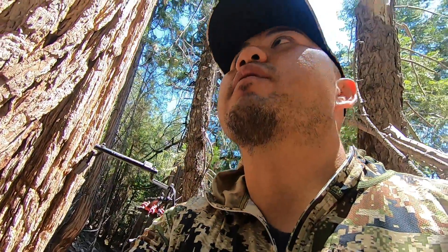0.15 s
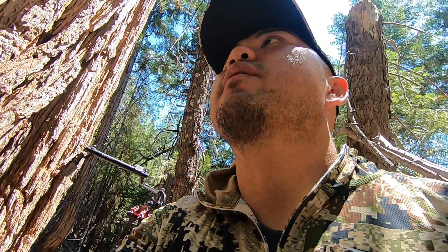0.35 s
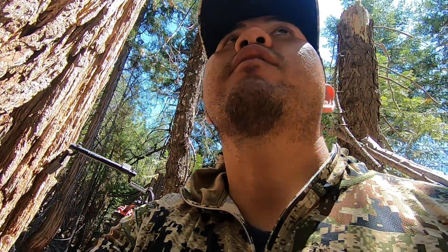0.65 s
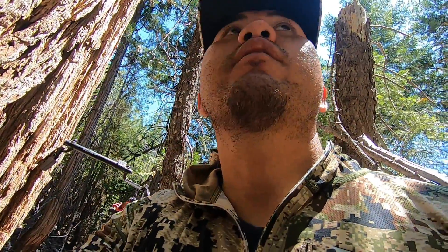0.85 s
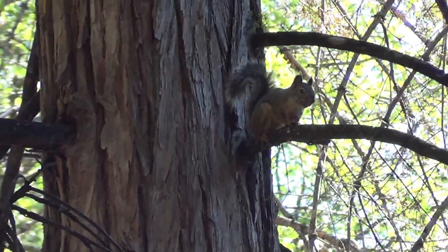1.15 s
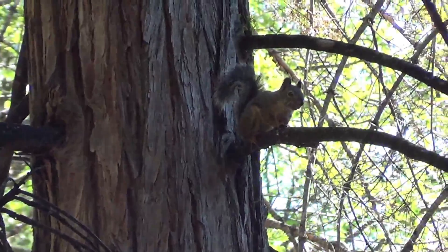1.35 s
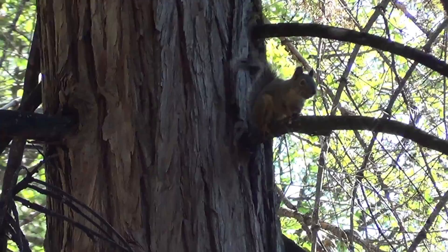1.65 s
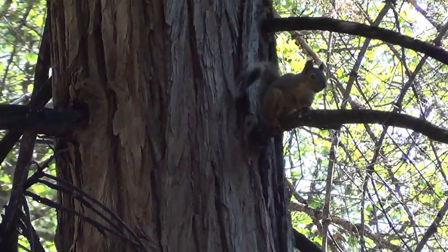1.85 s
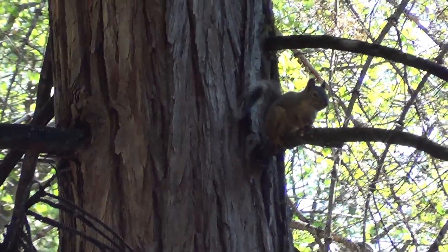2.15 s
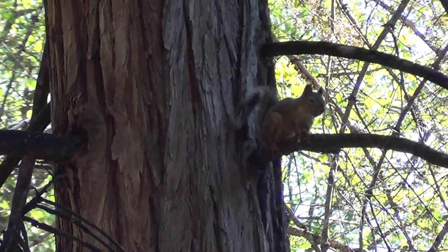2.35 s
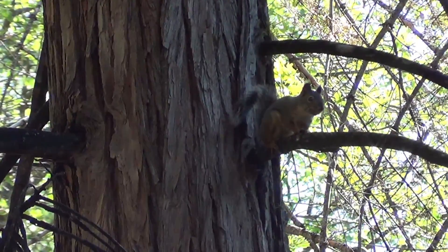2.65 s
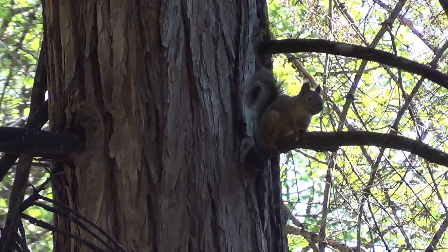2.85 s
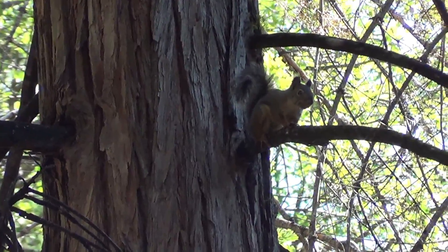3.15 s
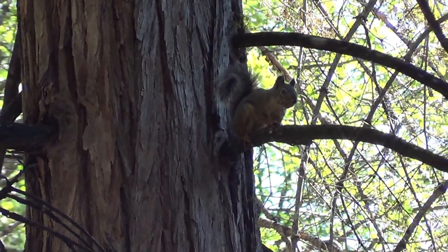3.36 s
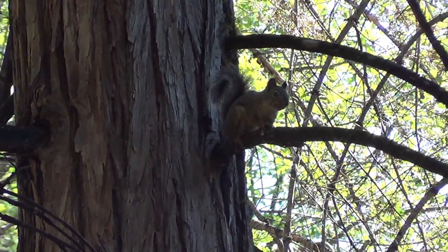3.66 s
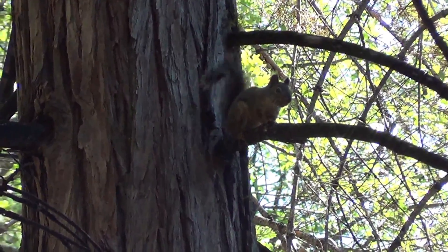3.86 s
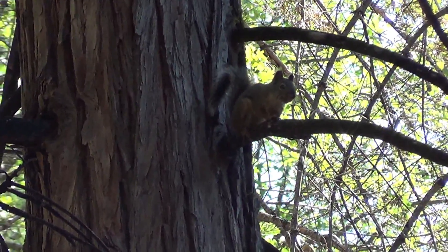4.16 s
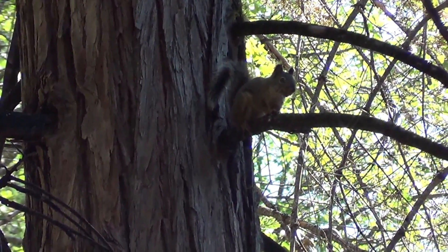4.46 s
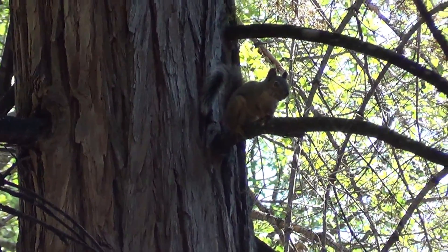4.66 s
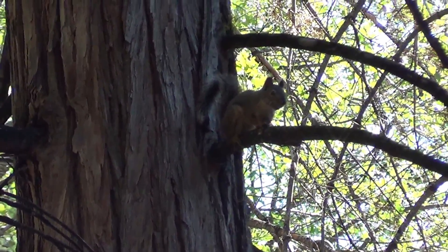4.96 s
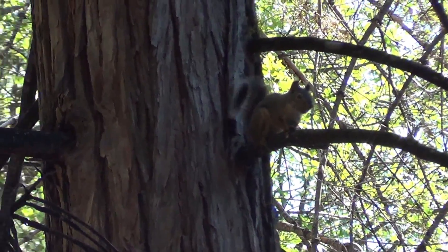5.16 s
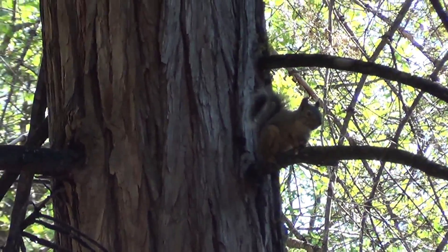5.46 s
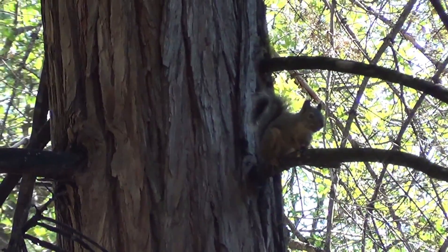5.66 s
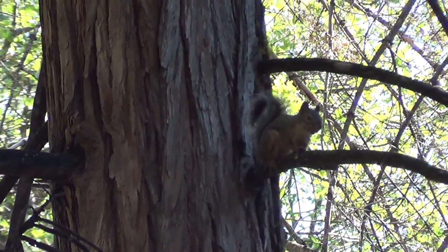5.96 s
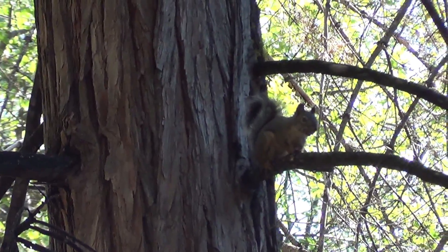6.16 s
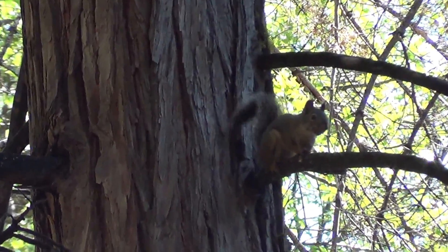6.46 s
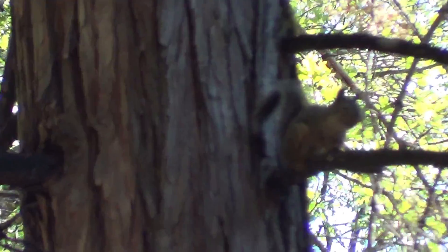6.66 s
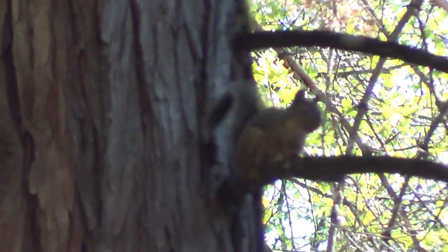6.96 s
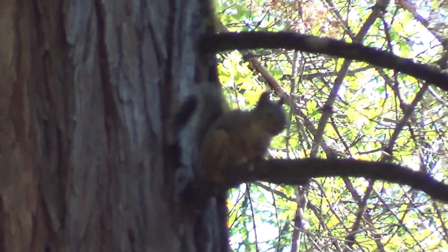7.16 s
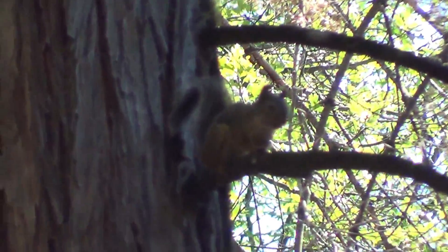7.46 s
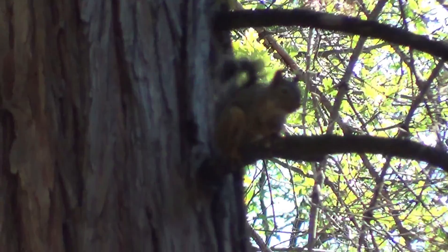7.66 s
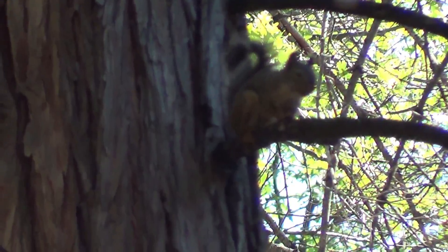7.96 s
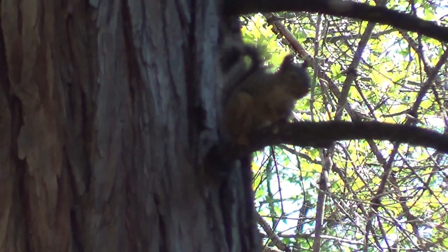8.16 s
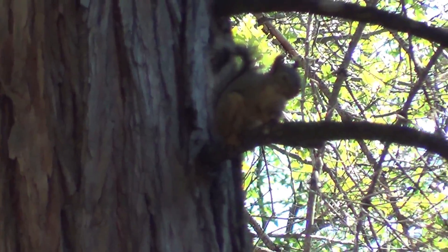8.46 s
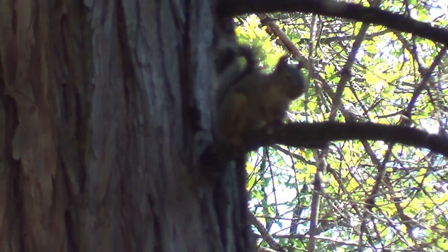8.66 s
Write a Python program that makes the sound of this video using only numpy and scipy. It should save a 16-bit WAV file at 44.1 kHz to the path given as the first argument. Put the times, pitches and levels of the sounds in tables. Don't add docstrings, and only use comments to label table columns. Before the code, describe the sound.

For the first second a hand and sleeve rub loudly over a small recorder, hissing, creaking and thudding, with sharp button snaps. It cuts abruptly to a much quieter forest: soft air hiss, faint motor whirr and a thin high whine. A squirrel scolds six times, about every 1.2 seconds, each a short rising chirp sinking into a faint sigh, with woodland echo. Small casing ticks, finger rustles and rare tiny bird chips fall between.

```python
import sys
import numpy as np
from scipy import signal
from scipy.fft import rfft, irfft
from scipy.io import wavfile

SR = 44100
rng = np.random.default_rng(int(sys.argv[2]) if len(sys.argv) > 2 else 0)


def to_linear_factor(level_db):
    exponent = np.asarray(level_db, float) / 20
    return 10 ** exponent


def wrap_up_sound(samples):
    columns = np.atleast_2d(samples).T
    tamed = np.clip(columns, -1, 1)
    steps = np.round(tamed * 32767).astype(np.int16)
    wavfile.write(sys.argv[1], SR, steps)


N = 388521

# t/s, sliding speed/dB, grip/dB
HAND = [(0, -35, -41.5), (.06, -38, -49.5), (0.122, -31, -53), (0.207, -24.5, -49.5), (.2145, -24.5, -48),
        (0.219, -31, -35), (0.232, -73, -50), (.26, -63.5, -55), (0.308, -50.5, -58.5), (.4, -36.5, -44),
        (0.443, -27.5, -39.5), (.472, -46, -39), (.53, -48, -37.5), (.66, -44, -34), (0.707, -48.5, -35),
        (0.712, -27.5, -27.5), (.766, -42.5, -30), (.772, -60, -40), (.782, -64, -44), (.83, -52, -37),
        (1.009, -46, -25), (1.02, -29.5, -19), (1.029, -17.5, -22), (1.034, -32, -20), (1.046, -60, -46)]
# level at mean speed and grip/dB, share of speed, share of grip
THUD_LAW = (-46.5, .01, 0.98)
SHELL_LAW = (-33, 0.87, -0.21)
RASP_LAW = (-36, 1, 0.015)
HISS_LAW = (-37.5, 1.27, -0.35)
# f/Hz, level/dB
RUB_COLOUR = [(27, -23), (60, -18), (102, -25.5), (190, -15), (290, -27.5), (494, -29.5), (941, -8),
              (1110, 6.5), (1450, 0), (2050, -0.5), (2450, -9), (3260, -6.5), (4890, -12.5), (6660, -14),
              (7800, -14), (9500, -15), (10600, -28.5), (14800, -38), (15400, -70)]
# f/Hz, side over mid/dB
RUB_SIDE = [(60, 4), (110, -5), (200, -5), (380, -4), (700, 10), (1290, 8.5), (2380, -1.5), (4400, -2.5),
            (8120, 2.5), (15000, -5.5)]
# f/Hz, share of side lagging mid, share of side in step with mid
RUB_TIE = [(300, .2, 0), (1200, 0.99, 0.0048), (1994, 0.79, 0.), (3470, 0.017, 0.0054), (5970, 0.13, 0),
           (7900, 0.35, 0.64), (11900, .1, 0.16)]
# t/s, length/s, level/dB, centre f/Hz, left over right/dB
DRAGS = [(0, .11, -40.5, 6900, 6), (0, 0.062, -39, 1160, 0), (.115, .055, -23.5, 1990, 1),
         (.17, .047, -24, 7800, 12), (.175, .04, -26, 2930, 2), (.15, .065, -34, 9200, 5),
         (.375, 0.1, -27.5, 1280, -1.5), (.41, 0.054, -41, 2040, -14), (.995, .035, -56, 11000, 2),
         (1.022, 0.015, -25.5, 1580, 1), (.81, 0.17, -56, 5000, -3), (.53, .12, -44, 1930, -4),
         (.625, .06, -43.5, 6900, 1), (.63, .05, -47, 3750, 0), (0.65, 0.046, -45, 7500, 4),
         (.1, 0.055, -32.5, 3250, 0), (.9, 0.14, -42, 2900, -4)]
# t/s, rasp/dB, thud/dB, sideways ring/dB
SLIPS = [(.218, -19.5, -21, -10), (0.364, -20.5, -24, -30), (.432, -27, -55, -7), (0.4784, -12, -22.5, 4),
         (.496, -23, -23.5, -19), (.517, -32, -22.5, -6), (0.5478, -23, -24, -20), (.566, -42, -42, -6),
         (0.5831, -19, -32, -5), (.596, -37, -27, -23), (0.617, -20, -29, -10), (.635, -22, -28, -5),
         (0.6513, -21.5, -34, -18), (0.6775, -16.5, -36, -7), (0.7105, -17, -27, -14.5),
         (.7645, -17, -44, -26), (0.7887, -28, -39, -23), (.819, -16, -22.5, -30),
         (0.8392, -20.5, -32, -27), (.858, -26, -22, -34), (.878, -19, -18, -27),
         (0.8928, -18.5, -16.5, -34), (0.9083, -26.5, -16, -25), (0.9329, -17.5, -15.5, -27),
         (0.9561, -16, -30, -23), (0.9742, -16.5, -28, -23.5), (0.9866, -17.5, -15, -39),
         (1.0005, -20, -34, -30), (1.012, -32, -17, -30), (1.0195, -10, -23, -28), (1.005, -19, -25, -26),
         (1.0275, -15.5, -10.5, -30)]
# f/Hz, t60/s
THUD = (174, 0.023)
# f/Hz, t60/s
SHELL = (1225, 0.0098)
# f/Hz, level/dB, t60/s
RASP = [(850, -3, 0.0031), (1620, -3, 0.004), (2636, -2, 0.0046), (3200, -12.5, 0.0047),
        (4620, -6.5, 0.0026), (6740, -31, 0.0048)]
# t/s, peak level/dB
SNAPS = [
    (0.2185, 3),
    (0.365, -22),
    (0.8306, -44),
    (1.0313, -7.5),
    (1.038, -38),
    (1.0451, -42),
    (1.072, -49),
]
# f/Hz, level/dB
HUSH = [(15, -43), (25, -6), (118, 0.5), (450, -1), (488, -3), (1810, -9), (2430, -13), (2850, -15.5),
        (3440, -20), (3830, -11.5), (4500, -15.5), (5280, -12), (15000, -18)]
# f/Hz, side over mid/dB
HUSH_SIDE = [(60, -13), (110, -11.5), (200, -3.5), (380, -0.5), (700, 4), (1290, 3), (2380, 3.5),
             (4400, 2.5), (8120, -6), (15000, -12.5)]
# f/Hz, width/Hz, level/dB
WHIR = [(2510, 240, -70), (3406, 145, -65.5), (3551, 87, -63.5), (4436, 140, -65.5), (4880, 70, -71.5),
        (5720, 210, -73.5)]
# f/Hz, level/dB
WHINE = [(11832, -80), (15734.3, -70),
         (15747.6, -75)] + [(15734.3 - 59.94 * k, -88 - k) for k in range(1, 8)]
# t/s, length/s, level/dB, centre f/Hz, width/octaves
RUSTLES = [(1.125, 0.64, -66, 113.3, 0.13), (2.216, 0.12, -55, 2170, 2.6), (2.483, 0.14, -56, 527, 0.85),
           (3.114, 0.079, -57, 5700, 1.6), (3.119, 0.085, -57.5, 830, 0.8), (4.84, .1, -67, 8400, .6),
           (5.402, 0.28, -67, 1070, 0.7), (5.681, 0.1, -60, 1050, .5), (5.8, .25, -63.5, 200, 1.5),
           (6.15, 0.92, -58.5, 3800, 1.5), (6.28, 0.49, -63, 1120, 0.46), (6.381, .04, -59, 3700, .2),
           (6.638, 0.05, -55, 1150, 0.8), (6.704, 0.064, -55.5, 1220, 0.47),
           (6.787, 0.039, -58, 1180, 0.57), (6.788, 0.029, -52, 3200, 0.64),
           (6.582, 0.043, -54.5, 3100, 0.72), (6.573, 0.29, -58, 561, 0.22), (6.644, 0.13, -57, 3120, 0.91),
           (8.601, 0.4, -53.5, 3450, 1.8), (8.61, 0.22, -56, 4730, 0.16), (4.548, 0.12, -63, 1250, 0.42),
           (7.34, .1, -63, 7000, .35), (5.7, 0.086, -63.5, 7500, 0.61)]
# t/s, peak level/dB, snap f/Hz, hollow part/dB, sharp part/dB (both relative)
TICKS = [(1.262, -40, 2520, -16, 2), (2.006, -36.5, 2200, -13.5, 3.5), (2.258, -41, 2260, -14, -1),
         (2.4705, -22, 930, -5.5, -33), (3.116, -35, 1280, -11, -18), (3.376, -40, 1240, -15, -20),
         (3.429, -30, 1860, -46, -29), (4.21, -45, 1150, -19, 9), (4.461, -41.5, 1200, -16, 3),
         (5.178, -34, 1260, -19, -14), (5.811, -34, 1010, -10, -19), (5.973, -34, 950, -11, -21),
         (2.4702, -21.5, 2130, -47, -18), (6.659, -40.5, 1160, -6.5, -13), (6.705, -42, 1280, -25, -9),
         (6.889, -41, 910, -14, -12), (6.961, -41, 2520, -7.5, 3.5), (7.161, -34, 1150, -14, 2),
         (8.026, -41.5, 1150, -19, -10), (2.458, -37, 2310, -20, -23), (3.928, -31.5, 1300, -15.5, -30),
         (5.228, -35, 980, -5, -25), (5.827, -43, 1011, -26, -20), (7.704, -42, 1150, -12, -30),
         (7.7, -45, 1700, -30, -30), (7.711, -46, 800, -20, -30), (6.735, -46, 1250, -10, -20),
         (6.8, -47, 3000, -12, -10), (2.004, -43, 1150, -30, -30), (3.116, -38.5, 2200, -40, -30),
         (3.375, -38.5, 2050, -40, -30), (5.1776, -33.5, 2150, -38, -14), (5.2267, -38, 2250, -40, -30),
         (5.809, -38.5, 3150, -40, -30), (5.9722, -38, 2630, -40, -30), (7.1605, -33, 2220, -40, -30),
         (2.878, -47, 690, -4.5, -20), (6.705, -46, 2270, -40, -30), (6.956, -42.5, 480, -7, -30),
         (2.476, -34, 1260, -40, -30), (3.309, -52, 1475, -30, -20), (4.4605, -36.5, 2900, -40, -16),
         (7.161, -38, 5830, -40, -10)]
# pitch ratio, share, t60/s
SNAP_PARTIALS = [(1, 0.77, 0.013), (1.12, 0.38, 0.011), (1.75, 0.1, 0.0053), (2.5, 0.11, 0.013)]
# f/Hz, level/dB, t60/s
CASING = [(369, -0.5, 0.11), (460, -13, 0.13), (513, -1, 0.04), (586, -7.5, 0.13), (521.5, -10, 0.21),
          (910, 0, 0.068), (1150, -9, 0.061), (1280, -21, 0.14), (763, -14.5, 0.089)]
# t/s, length of the cry/s, top f/Hz, level/dB, stretch of the sigh
CHIRPS = [
    (1.544, .042, 2077, -1, 1.08),
    (2.744, 0.041, 2075, 0, 1.04),
    (3.902, 0.042, 2104, 0.7, 1.08),
    (5.238, 0.041, 2086, 1, 0.82),
    (6.44, .042, 2053, 1, 0.84),
    (7.646, 0.044, 2075, -0.5, 0.93),
]
# share of its length, f/Hz, fundamental level/dB, overtones/dB (relative)
CRY = [
    (0, 1843, -52.5, 4),
    (.2, 1881, -39.5, -0.5),
    (.33, 1951, -39.5, 6.5),
    (.58, 1962, -39.5, 4),
    (.8, 2032, -40, 1.5),
]
# t after the cry/s, drop in f/Hz, fundamental level/dB, overtones/dB (relative)
SIGH = [
    (.012, 106, -45, -11),
    (0.029, 257, -59, -21),
    (.06, 359.6, -62, -26),
    (.11, 505, -60, -32),
    (.15, 626, -61.5, -44),
    (.2, 680, -74, -40),
]
# multiple of the pitch, level/dB
OVERTONES = [(1, -0.5), (2, -9.5), (3, -6), (4, -12), (5, -3.5), (6, -19.5), (7, -28)]
# f/Hz, width/Hz, lift/dB
MOUTH = [(4133, 103, 10), (5810, 190, 5)]
# t/s, length/s, start f/Hz, end f/Hz, level/dB
BIRDS = [
    (2.295, 0.0107, 6140, 7050, -37.5),
    (2.305, .012, 7400, 9000, -41.5),
    (2.313, 0.0102, 9040, 6840, -46.5),
    (7.36, 0.03, 6600, 7000, -62),
    (7.385, .03, 7600, 8600, -63),
    (6.712, 0.091, 9360, 8250, -64),
    (8.583, 0.016, 5890, 7350, -35),
    (8.579, .0081, 4810, 6210, -52.5),
    (8.599, 0.011, 6200, 7110, -44),
    (8.6, 0.0081, 8010, 8400, -44),
]

MEAN_SPEED_DB, MEAN_GRIP_DB = -35, -45
CUFF_S, CUFF_HALF_WIDTH_S, CUFF_LIFT_DB = 0.418, 0.034, 5.9
HISS_DIP_FROM_S, HISS_DIP_TO_S, HISS_DIP_DB = .775, 1.02, 15
GRIND_FROM_S, GRIND_TO_S, GRIND_LIFT_DB = .8, 1.02, 3.5
DRAG_OCTAVES, DRAG_LUMP_DB = 0.27, 2.5
CHATTER_FROM_S, CHATTER_TO_S, CHATTER_COUNT = .485, 1.02, 40
CHATTER_DB, CHATTER_SPREAD_DB = -30, 17
HAND_HISS_DB = -65
GAP_DB, GAP_FROM_HZ, GAP_BAND_HZ = -81.5, 8000, 500
CUT_S, FADE_S = 1.046, .03
HUSH_DB = -56
GRAIN_DB = 4
FOREST_T60_S, FOREST_DB = 0.41, -9.5
TOP_DB, TOP_BRIGHT_DB = -42, -3.5
TRUNK_ECHO_S, TRUNK_ECHO_DB = .066, -19


def rms_one(x):
    return x / np.sqrt(np.mean(x ** 2) + 1e-20)


def at_hz(points, hz, column=1):
    points = np.array(points)
    return np.interp(np.log(hz + 1), np.log(points[:, 0]), points[:, column])


def drift(rate_hz, size):
    knot_rate = 400
    knots = rng.standard_normal(int(size / SR * knot_rate) + 40)
    r = np.exp(-2 * np.pi * rate_hz / knot_rate)
    slow = rms_one(signal.lfilter([1], [1, -2 * r, r * r], knots)[30:])
    return np.interp(np.arange(size) / SR * knot_rate, np.arange(len(slow)), slow)


def ring(x, hz, t60):
    r = to_linear_factor(-60 / (max(t60, .002) * SR))
    w = 2 * np.pi * hz / SR
    return signal.lfilter([0, np.sin(w)], [1, -2 * r * np.cos(w), r * r], x + 1e-18)


def above(x, cut_hz):
    return signal.sosfilt(signal.butter(2, cut_hz, "high", fs=SR, output="sos"), x)


def between(x, low_hz, high_hz, order=2):
    return signal.sosfilt(signal.butter(order, [low_hz, high_hz], "band", fs=SR, output="sos"), x)


def ports(mid, side):
    return np.array([mid + side, mid - side])


def blows(times, gains, size, spread_s):
    span = 400
    out = np.zeros(size + span)
    fall = np.exp(-np.arange(span) / (spread_s * SR))
    firm = 2.6 * (np.arange(span) == 0)
    for s, gain, grit in zip(times, gains, rng.standard_normal((len(times), span))):
        contact = grit * fall + firm
        out[round(s * SR):][:span] += gain * contact / np.linalg.norm(contact)
    return out[:size]


def rub_levels(s, speed_db, grip_db):
    thud, shell, rasp, hiss = [
        db + by_speed * (speed_db - MEAN_SPEED_DB) + by_grip * (grip_db - MEAN_GRIP_DB)
        for db, by_speed, by_grip in (THUD_LAW, SHELL_LAW, RASP_LAW, HISS_LAW)]
    shell = shell + CUFF_LIFT_DB * np.exp(-((s - CUFF_S) / CUFF_HALF_WIDTH_S) ** 2)
    shell = shell - 6 * (s > GRIND_TO_S)
    rasp = rasp + GRIND_LIFT_DB * ((s > GRIND_FROM_S) & (s < GRIND_TO_S))
    hiss = hiss - HISS_DIP_DB * ((s > HISS_DIP_FROM_S) & (s < HISS_DIP_TO_S))
    return thud, shell, rasp, hiss


def rubbing(size):
    s, speed_db, grip_db = np.transpose(HAND)
    lumps_db = 2.4 * np.minimum(rng.exponential(1, size), 4) + 1.3 * drift(90, size)
    common, own = rfft(rng.standard_normal((2, size)) * to_linear_factor(lumps_db))
    hz = np.arange(len(own)) * SR / size
    lag, step = (np.clip(at_hz(RUB_TIE, hz, column=c), -.7, .7) for c in (1, 2))
    side = (step - 1j * lag) * common + np.sqrt(1 - lag ** 2 - step ** 2) * own
    side = side * to_linear_factor(at_hz(RUB_SIDE, hz))
    pair = to_linear_factor(at_hz(RUB_COLOUR, hz)) * np.array([common, side])
    out = 0
    edges_hz = (22, 500, 2300, 5700, 15500)
    for low, high, level_db in zip(edges_hz, edges_hz[1:], rub_levels(s, speed_db, grip_db)):
        window = 1 / np.sqrt((1 + (low / (hz + 1)) ** 12) * (1 + (hz / high) ** 12))
        mid, side = irfft(pair * window, size)
        level = to_linear_factor(np.interp(np.arange(size) / SR, s, level_db))
        out = out + level * ports(mid, side) / np.std(mid)
    return out


def drags(size):
    out = np.zeros((2, size))
    for s, length, db, centre_hz, pan_db in DRAGS:
        span = round(length * SR)
        grit = rng.standard_normal((2, span)) * to_linear_factor(DRAG_LUMP_DB * drift(70, span))
        half = 2. ** (DRAG_OCTAVES / 2)
        swell = np.hanning(span) ** 0.34 * to_linear_factor(db)
        mid, own = rms_one(between(grit, centre_hz / half, centre_hz * half)) * swell
        side = .6 * own
        if centre_hz < 1700:
            side = side + 2.2 * np.roll(mid, round(SR / centre_hz / 4))
        pan = to_linear_factor([[pan_db / 2], [-pan_db / 2]])
        out[:, round(s * SR):][:, :span] += ports(mid, side) * pan
    return out


def treble_gaps(x):
    hz, _, cells = signal.stft(x, SR, nperseg=1024)
    for low in np.arange(GAP_FROM_HZ, 16000, GAP_BAND_HZ):
        band = (hz >= low) & (hz < low + GAP_BAND_HZ)
        level = np.sqrt(np.sum(np.abs(cells[:, band]) ** 2, axis=(0, 1)))
        loud = np.sqrt(np.sum(np.abs(cells) ** 2, axis=(0, 1)))
        luck = to_linear_factor(rng.normal(0, 2, len(level)))
        cells[:, band] *= level * luck > np.maximum(to_linear_factor(GAP_DB), to_linear_factor(-58) * loud)
    return signal.istft(cells, SR, nperseg=1024)[1][:, :x.shape[1]]


def creak(size):
    luck = rng.random((CHATTER_COUNT, 2))
    chatter_s = np.interp(luck[:, 0], (0, 1), (CHATTER_FROM_S, CHATTER_TO_S))
    chatter_db = CHATTER_DB + CHATTER_SPREAD_DB * np.log(luck[:, 1] + .05)
    chatter = [(at, db, db - 5.5, db) for at, db in zip(chatter_s, chatter_db)]
    s, rasp_db, thud_db, rock_db = np.transpose(list(SLIPS) + chatter)
    thud = above(ring(blows(s, to_linear_factor(thud_db + 6), size, 1e-6), *THUD), 124)
    rasp = 0
    varied_db = rng.normal(0, 2.2, (len(s), len(RASP))).T
    for (hz, db, t60), own_db in zip(RASP, varied_db):
        rasp = rasp + ring(blows(s, to_linear_factor(rasp_db + db + own_db + 4.0), size, 0.0023), hz, t60)
    rock = ring(blows(s, to_linear_factor(rock_db), size, 0.0012), *SHELL)
    centre = thud + above(rasp, 430)
    lag = 0.026 * (centre - np.roll(centre, 3)) + 0.48 * np.roll(thud, 65)
    return ports(centre, above(rock, 390) + lag)


def button_snaps(size):
    s, peak_db = np.transpose(SNAPS)
    crack = between(blows(s, to_linear_factor(peak_db + 10), size, 0.00044), 1500, 9000)
    return ports(crack, 0.26 * np.roll(crack, 2))


def hush():
    hz = np.arange(N // 2 + 1) * SR / N
    mid, side = rfft(rng.standard_normal((2, N))) * to_linear_factor(at_hz(HUSH, hz))
    mid, side = irfft([mid, side * to_linear_factor(at_hz(HUSH_SIDE, hz))], N)
    out = to_linear_factor(HUSH_DB - 1.5) * ports(mid, side) / np.std(mid)
    for centre_hz, width_hz, db in WHIR:
        mid, side = ring(rng.standard_normal((2, N)), centre_hz, 2.0 / width_hz)
        level = to_linear_factor(db + 1.02 * drift(1.6, N) + 2.0 * drift(38, N))
        out += level * ports(mid, 0.17 * side) / np.std(mid)
    t = np.arange(N) / SR
    for line_hz, db in WHINE:
        out += np.sqrt(2) * to_linear_factor(db + .6 * drift(2.3, N)) * np.sin(2 * np.pi * line_hz * t)
    return out


def rustles():
    out = np.zeros((2, N))
    for s, length, db, centre_hz, octaves in RUSTLES:
        size = round(length * SR)
        grain_db = min(GRAIN_DB / np.sqrt(octaves * centre_hz / 1500), 3.2)
        clumps = 1.64 * np.minimum(rng.exponential(1, size), 5) + drift(31, size)
        grit = rng.standard_normal((2, size)) * to_linear_factor(grain_db * clumps)
        edges_hz = np.clip(centre_hz * 2. ** (np.array([-.5, .5]) * octaves), 50, 18000)
        band = signal.butter(1, edges_hz, "band", fs=SR)
        noise = signal.lfilter(*band, signal.lfilter(*band, grit))
        mid, side = rms_one(noise) * np.hanning(size) ** 0.24 * to_linear_factor(db)
        start = round(s * SR)
        out[:, start:start + size] += ports(mid, 0.29 * side)[:, :N - start]
    return out


def ticks():
    s, peak_db, snap_hz, hollow_db, sharp_db = np.transpose(TICKS)
    out = np.zeros(N)
    for at, db, hz in zip(s, peak_db, snap_hz):
        blow = blows([0], [to_linear_factor(db + 3)], 2000, 1e-6)
        snap = sum(share * ring(blow, hz * ratio, t60) for ratio, share, t60 in SNAP_PARTIALS)
        out[round(at * SR):][:2000] += above(snap, .7 * hz)
    varied_db = rng.normal(0, 1.8, (len(s), len(CASING))).T
    for (hz, db, t60), own_db in zip(CASING, varied_db):
        out += ring(blows(s, to_linear_factor(peak_db + hollow_db + db + own_db - 1), N, 1e-6), hz, t60)
    out += between(blows(s, to_linear_factor(peak_db + sharp_db + 16), N, 0.0035), 2300, 7800)
    out = above(out, 430)
    return ports(out, 0.12 * (out - np.roll(out, 3)))


def forest(x):
    t = np.arange(round(.6 * SR)) / SR
    hits = rng.standard_normal((2, len(t))) * (rng.random((2, len(t))) < .08)
    echoes = hits * np.minimum(t / 0.008, 1)
    bright = echoes * to_linear_factor(-60 * t / (FOREST_T60_S * 0.6))
    dull = signal.lfilter([.5], [1, -.55], echoes) * to_linear_factor(-60 * t / FOREST_T60_S)
    response = .6 * bright + dull
    response = response / np.linalg.norm(response, axis=1, keepdims=True)
    return to_linear_factor(FOREST_DB) * signal.fftconvolve(x[None], response)[:, :N]


def squirrel():
    out = np.zeros(N)
    for start, length, top_hz, strength_db, stretch in CHIRPS:
        rows = [(share * length, *rest) for share, *rest in CRY]
        rows += [(length, top_hz, TOP_DB, TOP_BRIGHT_DB)]
        rows += [(length + s * stretch, top_hz - drop_hz, *rest) for s, drop_hz, *rest in SIGH]
        s, hz, level_db, bright_db = np.transpose(rows)
        t = np.arange(round(s[-1] * SR)) / SR
        slack = np.clip((t - .7 * length) / 0.03, 0, 1)
        pitch = np.interp(t, s, hz) * (1 + (0.003 + 0.012 * slack) * drift(96, len(t)))
        turn = 2 * np.pi * np.cumsum(pitch) / SR
        bright_db = np.interp(t, s, bright_db)
        voice = 0
        for k, db in OVERTONES:
            mouth_db = sum(lift_db / (1 + ((k * pitch - centre_hz) / width_hz) ** 2)
                           for centre_hz, width_hz, lift_db in MOUTH)
            flutter_db = (1.6 + 3.2 * slack) * drift(60, len(t))
            tilt_db = bright_db * min((k - 1) / 2.6, 1)
            voice = voice + to_linear_factor(db + mouth_db + tilt_db + flutter_db) * np.cos(k * turn)
        puffs = above(rng.standard_normal(len(t)), 2500) * (1 + np.cos(turn))
        air = to_linear_factor(bright_db - 22 + 7 * np.exp(-t / .012)) * puffs
        level = np.sqrt(2) * to_linear_factor(strength_db + np.interp(t, s, level_db)) * np.minimum(t / 0.0021, 1)
        out[round(start * SR):][:len(t)] -= level * (voice + air)
    return out


def trunks(x):
    cluster = rng.standard_normal((2, 700)) * (rng.random((2, 700)) < .2) * np.hanning(700)
    cluster = cluster / np.linalg.norm(cluster, axis=1, keepdims=True)
    late = np.roll(signal.lfilter([.6], [1, -.45], x), round(TRUNK_ECHO_S * SR) - 350)
    return to_linear_factor(TRUNK_ECHO_DB) * signal.fftconvolve(late[None], cluster)[:, :N]


def birds():
    out = np.zeros(N)
    for s, length, from_hz, to_hz, db in BIRDS:
        u = np.linspace(0, 1, round(length * SR))
        pitch = from_hz + (to_hz - from_hz) * np.sin(u * np.pi / 2)
        turn = 2 * np.pi * np.cumsum(pitch) / SR
        out[round(s * SR):][:len(u)] += to_linear_factor(db) * np.sin(np.pi * u) * np.sin(turn)
    return out


def scene():
    t, size = np.arange(N) / SR, round(1.1 * SR)
    handling = rubbing(size) + between(creak(size), 60, 7000, order=4) + drags(size)
    hiss = to_linear_factor(HAND_HISS_DB) * above(rng.standard_normal((2, size)), 6000)
    handling = treble_gaps(handling + hiss)

    voice, chips, taps = squirrel(), birds(), ticks()
    scattered = forest(voice + 1.5 * chips + .35 * taps.mean(axis=0))
    woods = voice + trunks(voice) + .6 * chips + taps + scattered + rustles() + hush()

    out = woods * np.clip((t - CUT_S - .025) / FADE_S, 0, 1)
    out[:, :size] += handling * np.clip((CUT_S - t[:size]) / .007, 0, 1)
    out[:, :size] += button_snaps(size)
    return out


def band_limit(x):
    return signal.sosfilt(signal.butter(12, 15790, fs=SR, output="sos"), x)


def record(dry):
    return band_limit(np.clip(dry, -1, 1))


dry = scene()
out = record(dry)
wrap_up_sound(out)
```